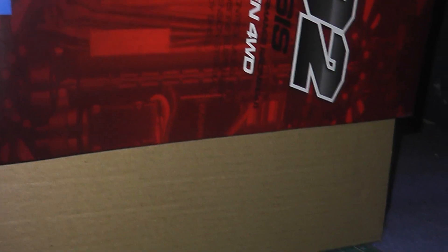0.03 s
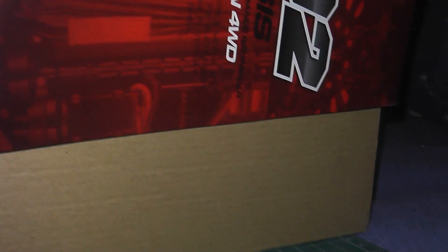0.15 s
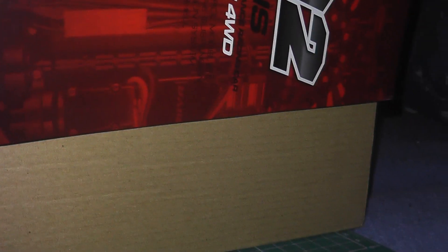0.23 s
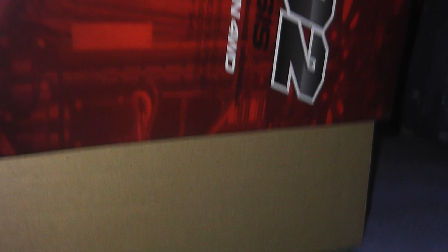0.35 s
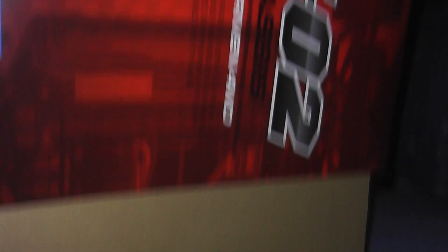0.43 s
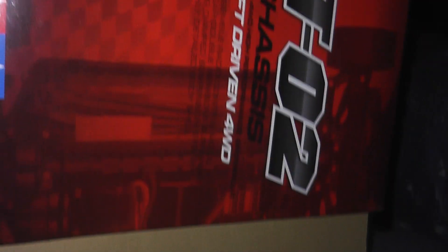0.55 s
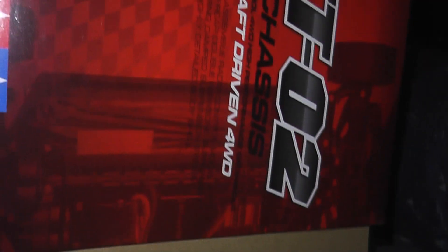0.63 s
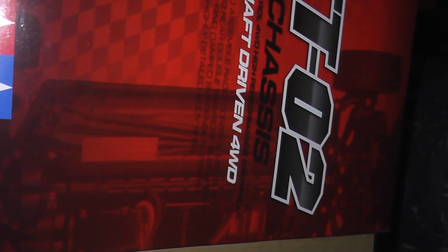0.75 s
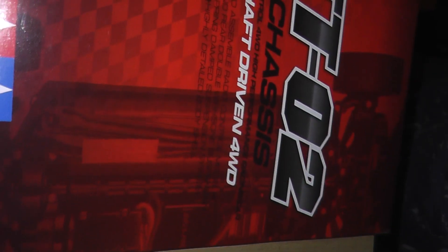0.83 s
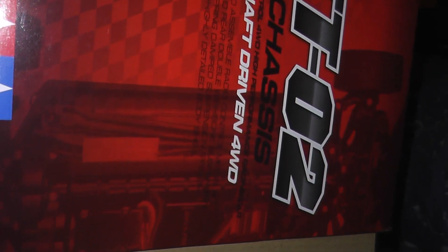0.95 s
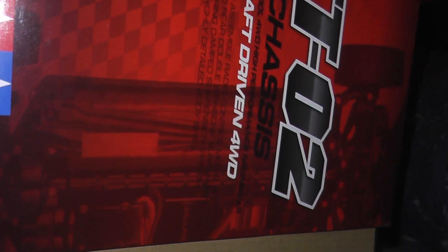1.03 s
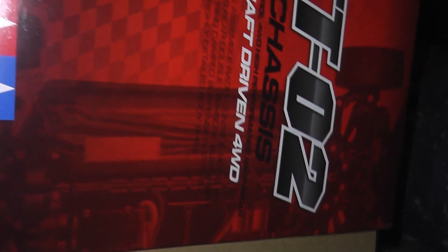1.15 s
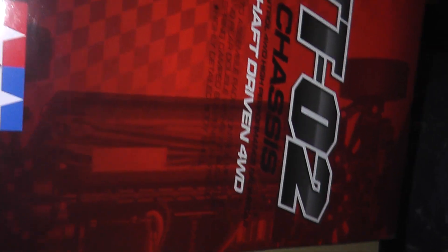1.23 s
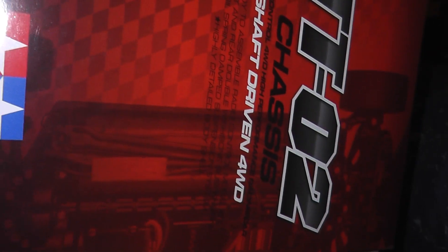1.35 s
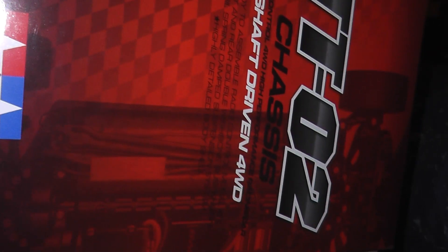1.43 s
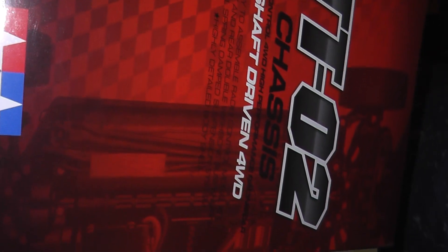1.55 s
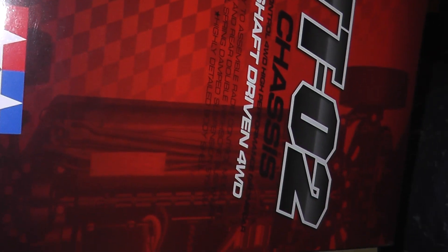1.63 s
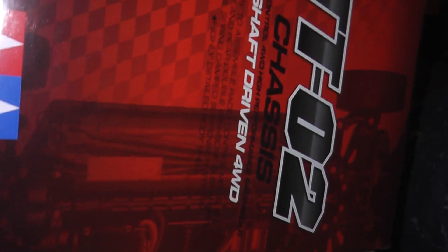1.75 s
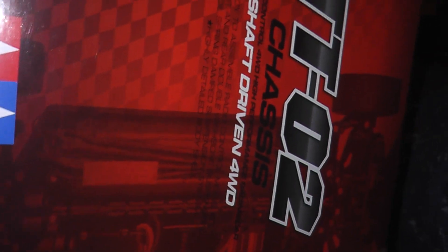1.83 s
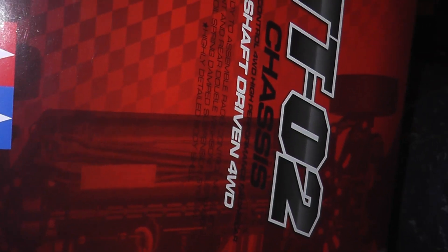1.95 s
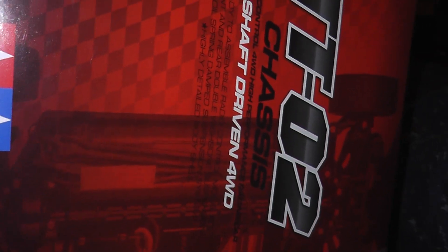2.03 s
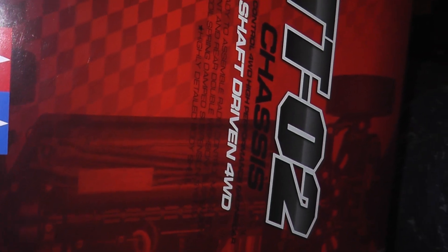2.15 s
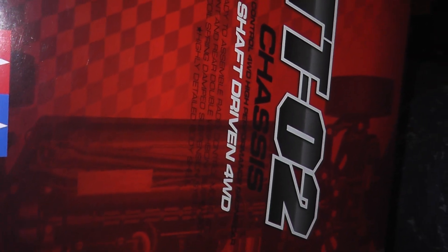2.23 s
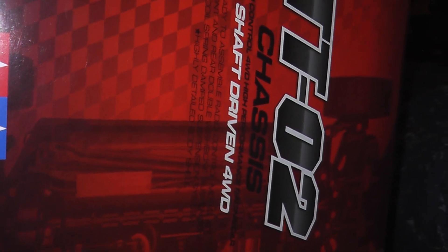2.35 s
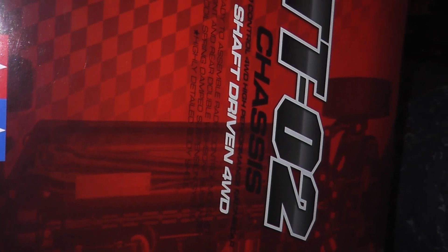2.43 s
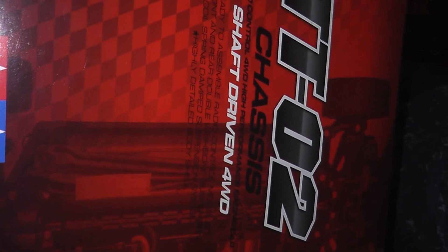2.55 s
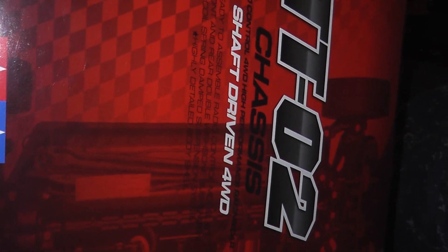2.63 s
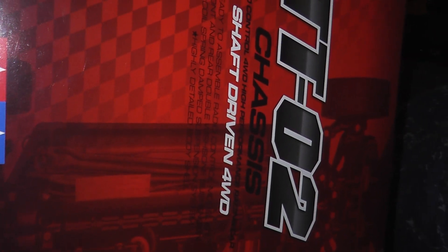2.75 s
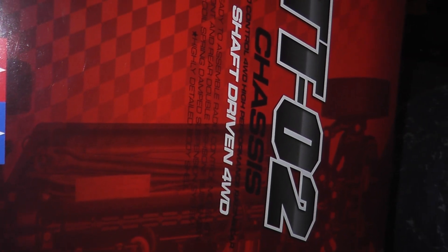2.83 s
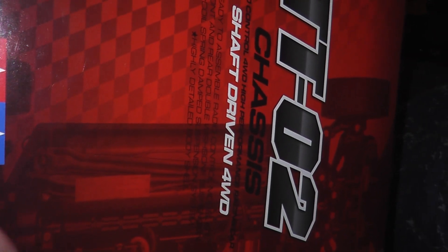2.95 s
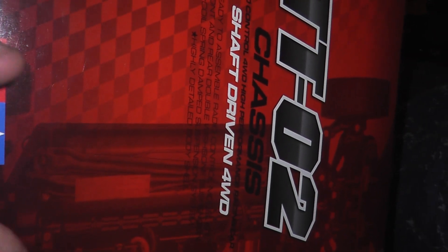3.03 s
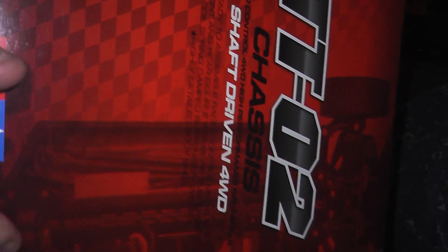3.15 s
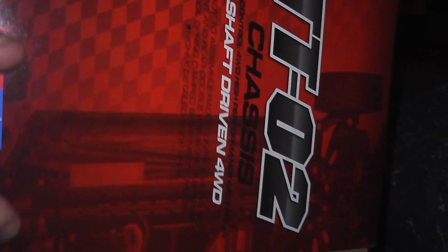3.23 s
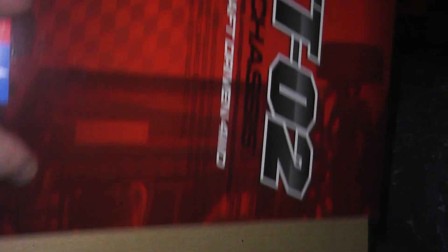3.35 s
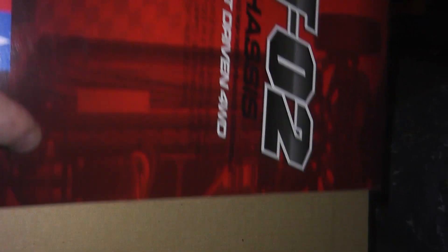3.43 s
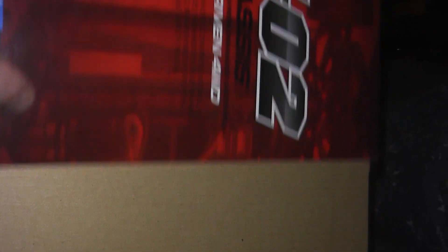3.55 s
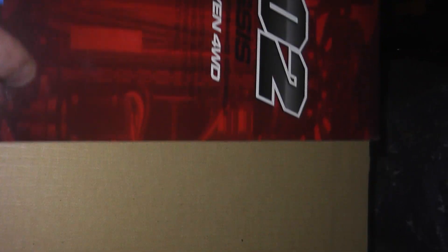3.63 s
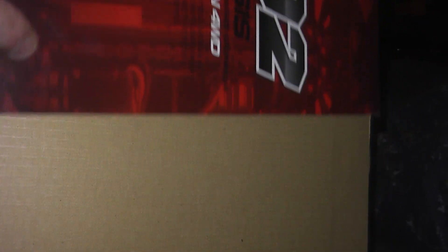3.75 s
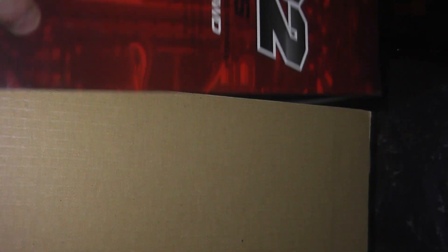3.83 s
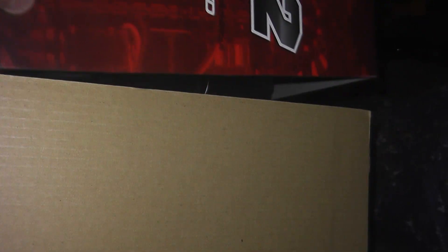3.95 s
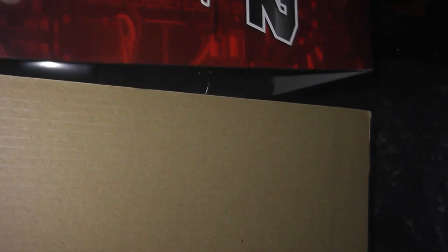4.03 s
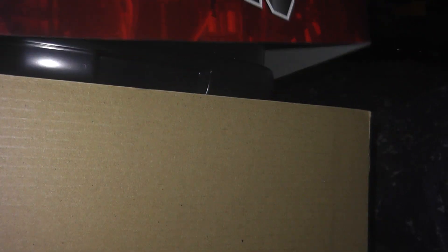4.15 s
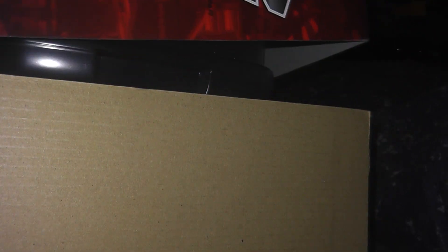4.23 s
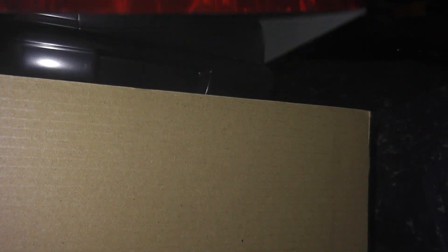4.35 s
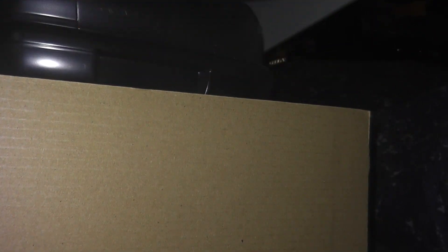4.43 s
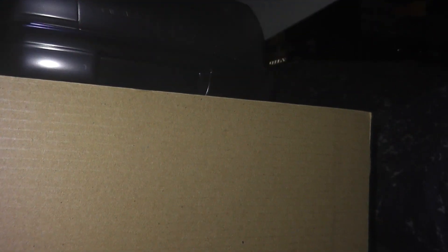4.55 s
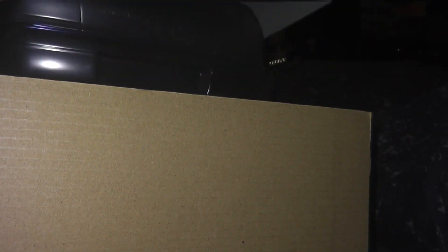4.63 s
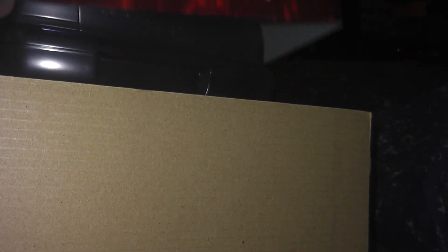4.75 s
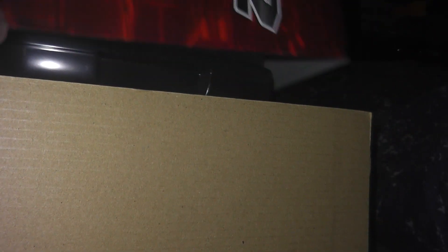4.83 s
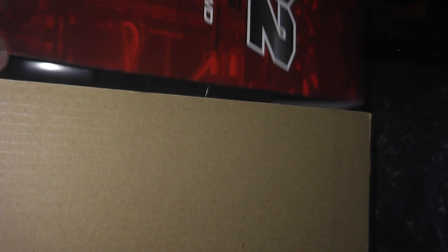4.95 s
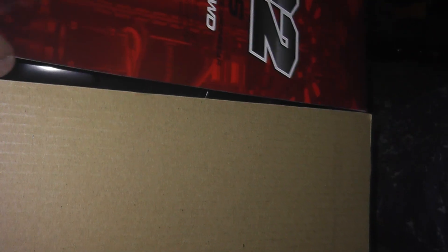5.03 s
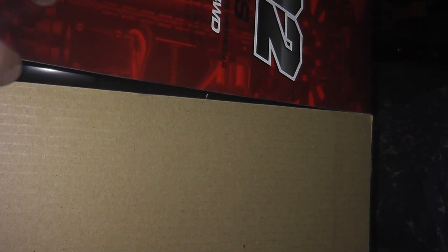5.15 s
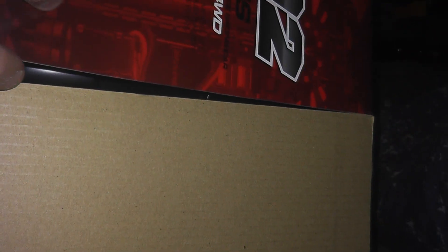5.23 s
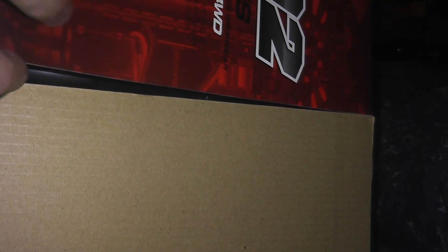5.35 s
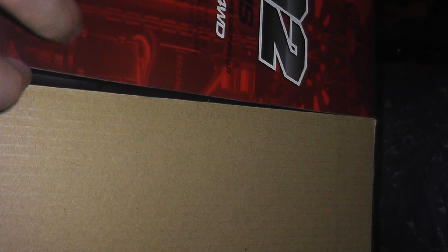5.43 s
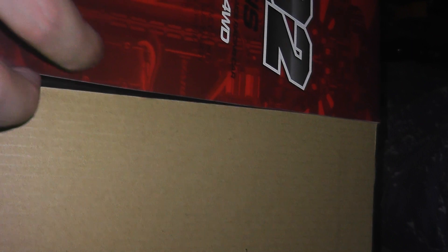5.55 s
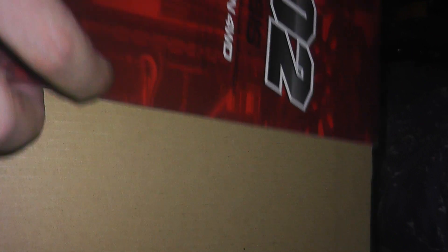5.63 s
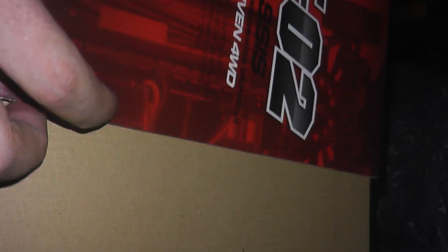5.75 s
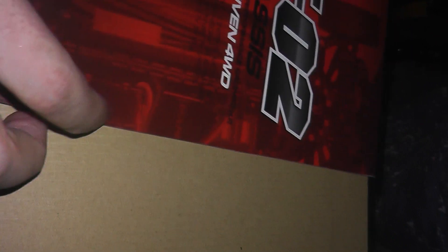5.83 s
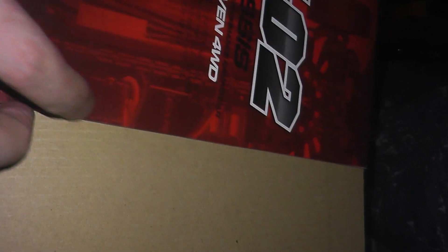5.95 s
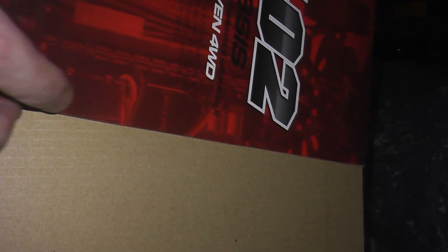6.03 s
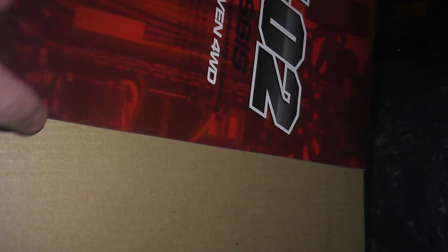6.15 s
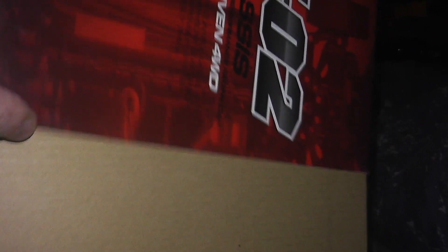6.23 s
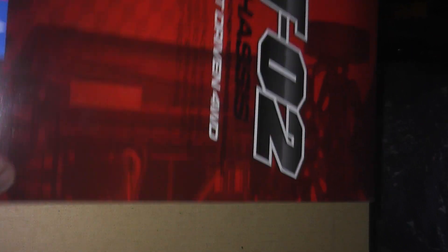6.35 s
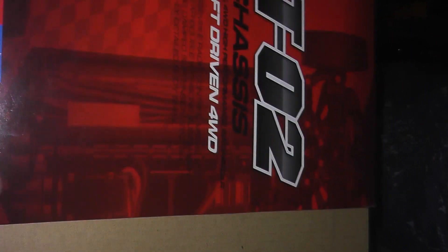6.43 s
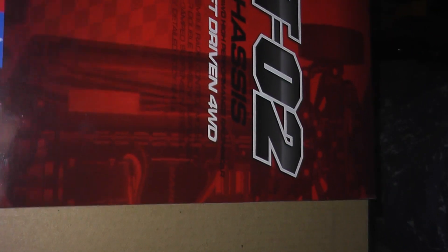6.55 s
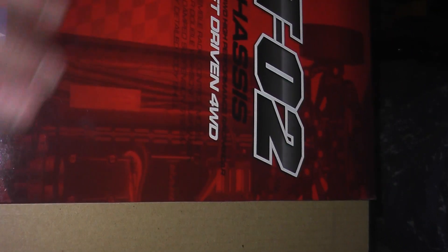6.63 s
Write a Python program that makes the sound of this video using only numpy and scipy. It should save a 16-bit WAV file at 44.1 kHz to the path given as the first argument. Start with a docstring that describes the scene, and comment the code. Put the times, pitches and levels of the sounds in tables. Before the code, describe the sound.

A cardboard lid and box are handled on a desk, close up, in a small dry room with low noise and a faint mains hum. From 0 to 0.6 s there are soft dull taps, small dry ticks and light rubbing; around 0.9 to 1.3 s a few fainter clicks and brushes. From 1.7 to 3.1 s it is nearly still, with only a weak papery rub and a soft tap at 2.8. From 3.2 to 4.2 s the lid slides with hiss, low rumble and small knocks. At 4.36 s comes a knock, then the loudest, a sharp hollow clack at 4.52. Boxy bumps and rumbling cluster from 4.8 to 5.1 s, then ease. At 5.6 s a brighter scrape begins, with knocks to 6.2. A strong thump at 6.27 s leads into rough scraping, a soft low puff at 6.47 and a fading rub.

```python
"""Card rubs on card as a thin lid slides over its corrugated base on a desk: noise shaped into a hiss,
a rim scrape and a rumble of the box walls. Knocks and ticks are noise bursts through resonances;
narrow bands of noise, from low growl to squeak, colour the rub and a decaying low sine is a puff of air.
Desk reflection dips and a faint room tail colour the box; room noise and a mains hum lie underneath."""
import sys
import numpy as np
from scipy import signal
from scipy.fft import rfft, irfft, next_fast_len
from scipy.io import wavfile
from scipy.ndimage import uniform_filter1d, map_coordinates

SR = 44100
rng = np.random.default_rng(int(sys.argv[2]) if len(sys.argv) > 2 else 0)


def inscribe(sig):
    """Save sig as 16-bit PCM at rate SR to the path in sys.argv[1].

    A 1-D sig is mono; a 2-D sig holds one channel per row.
    Samples are clipped to [-1, 1] before scaling.
    """
    pcm = np.round(np.clip(np.atleast_2d(sig).T, -1, 1) * 32767)
    wavfile.write(sys.argv[1], SR, pcm.astype(np.int16))


N = 295470


def amp(db):
    """Amplitude ratio of a level in dB."""
    return 10 ** (np.asarray(db) / 20)


def unit(x):
    """Scale to RMS 1."""
    return x / np.sqrt(np.mean(x ** 2) + 1e-20)


def along(points, hz):
    """Interpolate (freq_hz, value) points on a log frequency axis."""
    f, v = np.transpose(points)
    return np.interp(np.log(hz + 1), np.log(f + 1), v)


def wobble(rate_hz):
    """Smooth random curve, rate_hz knots a second."""
    knots = rng.standard_normal(int(N * rate_hz / SR) + 4)
    return map_coordinates(knots, [np.arange(N) * rate_hz / SR])


def filtered(x, response):
    """Multiply the spectrum of x by a complex response of frequency."""
    m = next_fast_len(x.shape[-1] + SR // 4)
    spectrum = rfft(x, m) * response(np.fft.rfftfreq(m, 1 / SR))
    return irfft(spectrum, m)[..., :x.shape[-1]]


def resonance(f, center_hz, width_hz):
    """Second-order band-pass, gain 1 at its centre."""
    return 1j * f * width_hz / (center_hz * center_hz - f * f + 1j * f * width_hz)


def modes(table):
    """Causal response of a set of resonances with alternating signs."""
    return lambda f: sum((-1) ** k * amp(db) * resonance(f, hz, width_hz)
                         for k, (hz, width_hz, db) in enumerate(table))


def walls(table):
    """Wall modes; soft card takes up little force above a kilohertz."""
    return lambda f: modes(table)(f) / (1 + 1j * f / 1100) ** 3


# Room noise spectrum, relative: freq_hz [Hz], density_db [dB per Hz]
ROOM_NOISE = [(25, -9), (60, 1), (125, -6.5), (250, -8.5), (600, -18.5), (1000, -21.5), (2300, -30.5),
              (3000, -25.5), (4500, -34), (5500, -24.5), (9000, -33.5), (16000, -38.5)]
# Left-right likeness of the room noise: freq_hz [Hz], likeness [-1 to 1]
ROOM_ALIKE = [(60, -0.016), (180, -0.29), (550, -0.84), (1650, 0.15), (4970, 1), (15000, 0.084)]


def background():
    """Partly correlated stereo room noise and a slightly unsteady 100 Hz mains hum."""
    def mid_side(f):
        angle = np.arccos(np.clip(along(ROOM_ALIKE, f), -1, 1)) / 2
        return amp(along(ROOM_NOISE, f)) * [1 + 0 * f, np.tan(angle)]

    mid, side = filtered(rng.standard_normal((2, N)), mid_side)
    noise = amp(-62.0) * np.array([mid + side, mid - side]) / np.std(mid)
    hum_gain = amp(-61.5) * amp(wobble(3.46))
    hum = hum_gain * np.sin(2 * np.pi * 100 * np.arange(N) / SR + 0.22 * wobble(5.3))
    return noise + hum


# Hands resting on the box: hiss_db, bright_db, rim_db, lower_wall_db, upper_wall_db [dB]
RESTING_DB = [-80, -96, -74.5, -72, -68.5]
# Long slides, one table each: time_s [s],
# hiss_db, bright_db, rim_db, lower_wall_db, upper_wall_db [dB]
SLIDES = [
    [(1.68, -71.5, -95, -68, -70, -67.5), (1.898, -71.5, -88, -69.5, -61.5, -60.5),
     (2.348, -62, -70, -62.5, -55, -55), (2.414, -74.5, -85, -73, -63, -63),
     (3.028, -66.5, -84, -67, -62, -58.5), (3.17, -66.5, -84, -59, -55, -63)],
    [(3.17, -65, -81, -58, -52, -50.5), (3.224, -56, -78, -48.5, -41, -48),
     (3.264, -63.5, -73, -54.5, -41.5, -56), (3.356, -54, -64, -52, -42.5, -44),
     (3.5, -58, -68, -53.5, -52.5, -49.5), (3.588, -53.5, -60, -51.5, -49, -47),
     (3.7, -68, -67, -54, -50, -55)],
    [(3.7, -64, -66, -54.5, -48.5, -51.5), (3.834, -57.5, -58, -56, -51, -51.5),
     (3.918, -62.5, -62, -55, -53, -54), (3.926, -50, -72, -59, -56, -56),
     (3.958, -60.5, -68, -53, -45, -46), (4.158, -67, -62.5, -56.5, -49.5, -54),
     (4.18, -74, -80, -65, -64, -52)],
    [(5.592, -47, -51, -49, -46, -35), (5.666, -59, -59, -56.5, -45, -46),
     (5.706, -51.5, -53, -52, -42, -46.5), (5.816, -58.5, -65, -55, -45, -43),
     (5.846, -49, -65, -40, -33, -33), (5.858, -64, -78, -53, -41, -46), (5.89, -71, -84, -69, -51, -53)],
    [(6.268, -48, -57, -39, -35, -34), (6.276, -43.5, -50.5, -41, -53, -29),
     (6.37, -51, -52.5, -40, -41, -40.5), (6.462, -49, -64, -35, -28.5, -33.5),
     (6.468, -52, -69, -55, -45, -47)],
    [(6.468, -55, -70, -35.5, -31, -34.5), (6.49, -57.5, -77, -49.5, -36.5, -44.5),
     (6.584, -55.5, -63, -52.5, -48, -49), (6.654, -69, -92, -59.5, -45.5, -47.5),
     (6.7, -67, -82, -71, -52, -63)],
]
# Short strokes: start_s, end_s [s], start_hiss_db, end_hiss_db [dB],
# bright_db, rim_db, lower_wall_db, upper_wall_db [dB over the hiss]
STROKES = [(0.056, 0.208, -63.5, -57, -9, -9, 4.4, 1.3), (0.202, 0.558, -63.5, -69, -20, 0.5, 12, 5.1),
           (1.094, 1.207, -67, -67, -16, -1, 3.1, 5), (1.21, 1.317, -57, -71.5, -24, 2, 2, 1.7),
           (4.319, 4.423, -66.5, -61, 4.5, 8, 18.3, 14.4), (4.43, 4.517, -59, -63, -12, 7, 16, 17),
           (4.516, 4.587, -38.5, -69.5, -9, 5, 8.3, 19), (4.589, 4.754, -65, -78.5, -18, 13, 27.6, 23),
           (4.768, 4.803, -58.5, -51, -17, 2, 19.7, 14), (4.82, 4.848, -58.5, -44, -22, 8, 25.3, 10),
           (4.901, 4.998, -56, -60, -10, 5, 25.2, 19.7), (5.005, 5.198, -62.5, -73.5, -10, 9.5, 27.3, 18),
           (5.191, 5.234, -62, -62.5, -6, 6, 20.3, 16.2), (5.235, 5.357, -79.5, -81, -10, 11, 25.3, 17.5),
           (5.348, 5.597, -67.5, -65.5, -9.5, 8.5, 19.3, 19.2), (5.884, 5.952, -68.5, -51, -7, 7, 13, 11.6),
           (5.951, 6.056, -60.5, -69.5, -13, 9.5, 19, 18.7), (6.043, 6.113, -53, -57.5, -17, 2.5, 7.4, 4.4),
           (6.109, 6.256, -53, -55.5, -11, 5.5, 8.8, 7.9)]
ATTACK_S, RELEASE_S = 0.028, 0.013  # the hand sets off and stops


def strokes():
    """Gains of the five rubbing layers: each slide or stroke sets off, follows its levels and stops."""
    t = np.arange(N) / SR
    power = amp(2 * np.array(RESTING_DB))[:, None] * np.ones(N)
    short = []
    for start_s, end_s, start_db, end_db, *over_db in STROKES:
        ends = [(start_s, start_db), (end_s, end_db)]
        short.append([(s, db, *(db + np.array(over_db))) for s, db in ends])
    for rows in [*SLIDES, *short]:
        s, *levels_db = np.transpose(rows)
        i = max(round((s[0] - ATTACK_S) * SR), 0)
        j = round((s[-1] + RELEASE_S) * SR)
        now = t[i:j]
        ramp = np.minimum((now - s[0]) / ATTACK_S, (s[-1] - now) / RELEASE_S)
        gate = np.clip(ramp + .5, 0, 1)
        gains = amp([np.interp(now, s, db) for db in levels_db])
        power[:, i:j] += (gains * gate) ** 2
    return np.sqrt(power)


def fibres(grain_db, rate_hz, patchy_db, wide):
    """Friction force along a wide contact, for two ports: noise in uneven grains and colour patches."""
    _, _, z = signal.stft(rng.standard_normal((2, N)), SR, nperseg=512)
    patches = uniform_filter1d(rng.standard_normal(z.shape[1:]), 10, 0)
    patches = uniform_filter1d(patches, 8, 1)
    noise = signal.istft(z * amp(patchy_db * unit(patches)), nperseg=512)[1][:, :N]
    a, b = noise * amp(grain_db * wobble(rate_hz))
    return np.array([a + wide * b, a - wide * b])


def slips(rate_hz, size):
    """Now and then the card sticks and lets go: a gain that jumps and fades within milliseconds."""
    jumps = (rng.random(N) < rate_hz / SR) * rng.exponential(size, N)
    decay = np.exp(-1 / (.004 * SR))
    return 1 + signal.lfilter([1], [1, -decay], jumps)


# Where the hiss is strongest as the contact moves: time_s [s], peak_hz [Hz]
SHEEN = [(0, 7040), (1.7, 6800), (1.9, 8540), (2.1, 7400), (3.05, 6130), (3.4, 6000), (3.9, 7600),
         (4.4, 7900), (5.7, 8500), (6.1, 5500), (6.7, 6860)]


def sheen(x):
    """A broad 6 dB peak that wanders through the hiss."""
    hz, t, z = signal.stft(x, SR, nperseg=512)
    octaves = np.log2((hz[:, None] + 1) / np.interp(t, *np.transpose(SHEEN)))
    peak_db = 6 * np.exp(-(octaves / .22) ** 2)
    return signal.istft(z * amp(peak_db), nperseg=512)[1][:, :N]


# Surface hiss spectrum, relative: freq_hz [Hz], density_db [dB per Hz]
HISS = [(1800, -39), (2500, 3.5), (3000, 0.5), (4500, 1.5), (5500, 1), (8000, 0.5), (9500, -4),
        (11000, -48)]
# Brightest part of the hiss, relative: freq_hz [Hz], density_db [dB per Hz]
BRIGHT = [(8000, -9.5), (9500, -3), (11000, -1.5), (13000, -6.5), (16000, -16)]
# Modes of the lid's rim: center_hz [Hz], width_hz [Hz], relative_db [dB]
RIM = [(821, 122, -2), (1139, 140, -2), (1404, 151, -5.5), (1566, 116, -4.5), (1795, 440, -10.5)]
# Modes of the box walls, first four lower: center_hz [Hz], width_hz [Hz], relative_db [dB]
WALLS = [(94, 62, -4.5), (150.4, 38.6, 1), (211.6, 38, -2), (267.2, 36.3, 1.5), (296, 47, -2),
         (406.4, 94, -2.5), (544, 89, -2.5), (646, 84, -4), (854, 190, -17)]
CATCH_DB = -61.5  # hiss level under which the card slides without catching fully


def rubbing():
    """Card on card: the surface hisses evenly, the rim scrapes, the walls rumble in lumps."""
    hiss_gain, bright_gain, rim_gain, lower_gain, upper_gain = strokes()
    surface = fibres(grain_db=1.5, rate_hz=400, patchy_db=1.5, wide=.15)
    hiss = unit(sheen(filtered(surface, lambda f: amp(along(HISS, f)))))
    bright = unit(filtered(surface, lambda f: amp(along(BRIGHT, f))))

    catching = slips(rate_hz=45, size=.55) ** np.clip(hiss_gain / amp(CATCH_DB), 0, 1)
    scrape = catching * fibres(grain_db=-0.5, rate_hz=81, patchy_db=2.0, wide=0.086)
    rim = unit(filtered(scrape, modes(RIM)))

    lumps = catching * fibres(grain_db=2.0, rate_hz=36, patchy_db=2.5, wide=0.12)
    lower = unit(filtered(lumps, walls(WALLS[:4])))
    upper = unit(filtered(lumps, walls(WALLS[4:])))
    surface_sound = hiss_gain * hiss + bright_gain * bright
    return surface_sound + rim_gain * rim + lower_gain * lower + upper_gain * upper


def burst(response, t60_s, push, rise_s):
    """One contact of peak 1: a push and a short rattle of after-contacts through a resonant body."""
    t = np.arange(SR // 4) / SR
    force = rng.standard_normal(len(t)) * amp(-60 * t / np.clip(t60_s, .002, .4))
    force[0] += push
    sound = filtered(force, response) * amp(-60 * t / 1.2) * (1 - np.exp(-t / rise_s))
    return sound / np.abs(sound).max()


# Knocks on the box: start_s [s], peak_db [dB before left-right scatter], pitch_hz [Hz],
# t60_s [s, of the rattle; also sets the panel's damping]
KNOCKS = [(0.01, -33, 200, 0.017), (0.023, -30.5, 168, 0.03), (0.172, -42.5, 150, 0.06),
          (0.416, -23.5, 160, 0.06), (0.51, -40.5, 196, 0.17), (0.874, -40, 305, 0.063),
          (1.082, -40, 117, 0.03), (1.151, -45, 353, 0.051), (2.802, -29.5, 260, 0.13),
          (3.122, -36, 113, 0.34), (3.237, -27.5, 220, 0.11), (3.35, -27.5, 130, 0.18),
          (3.633, -28.5, 195, 0.086), (3.662, -32.5, 142, 0.066), (3.926, -21, 560, 0.088),
          (3.929, -25, 169, 0.071), (3.954, -34.5, 182, 0.043), (3.999, -31.5, 445, 0.12),
          (4.108, -35, 197, 0.14), (4.362, -17, 614, 0.04), (4.373, -24, 437, 0.024),
          (4.424, -29, 280, 0.12), (4.444, -30, 563, 0.03), (4.517, -7, 162, 0.028),
          (4.519, -12, 463, 0.04), (4.536, -18.5, 240, 0.08), (4.59, -21.5, 454, 0.089),
          (4.764, -29.5, 262, 0.068), (4.827, -14, 267, 0.24), (4.86, -16.5, 148, 0.081),
          (4.881, -20, 178, 0.11), (4.899, -15.5, 253, 0.14), (4.944, -20.5, 190, 0.043),
          (5.014, -22.5, 262, 0.09), (5.075, -22, 180, 0.086), (5.132, -24, 165, 0.093),
          (5.351, -36, 199, 0.15), (5.586, -24.5, 290, 0.06), (5.609, -27, 136, 0.07),
          (5.766, -26.5, 268, 0.088), (5.801, -24, 260, 0.08), (5.934, -16, 227, 0.037),
          (6.042, -30, 192, 0.032), (6.117, -34, 207, 0.09), (6.203, -22.5, 252, 0.08),
          (6.275, -11, 210, 0.14), (6.286, -15, 553, 0.045), (6.325, -20.5, 626, 0.06),
          (6.347, -24, 650, 0.039)]
RATTLE = 0.039  # after-contacts over the blow
SCATTER_DB = 1.5  # left-right scatter of the struck spots


def knocks():
    """A soft blow rings the struck panel at its own pitch and, more weakly, the wall modes near it."""
    out = np.zeros((2, N + SR))
    for start_s, peak_db, pitch_hz, t60_s in KNOCKS:
        panel_width_hz = np.log(1000) / (np.pi * t60_s) + 0.064 * pitch_hz

        def body(f):
            near = 0.25 + 0.52 * resonance(f, pitch_hz, pitch_hz)
            panel = 1.4 * resonance(f, pitch_hz, panel_width_hz)
            return (walls(WALLS)(f) * near + panel) / (1 + 1j * f / (5 * pitch_hz))

        side = amp(SCATTER_DB * rng.standard_normal() * np.array([[.5], [-.5]]))
        blow = burst(body, t60_s, push=1 / RATTLE, rise_s=0.00075)
        out[:, round(start_s * SR):][:, :SR // 4] += amp(peak_db) * side * blow
    return out[:, :N]


# Edges catching: start_s [s], snap_peak_db [dB], pitch_hz [Hz], rim_peak_db [dB]
TICKS = [(0.023, -32.5, 5470, -31), (0.094, -65, 3000, -45), (0.129, -69, 3000, -45),
         (0.173, -64, 3000, -47), (0.193, -40, 6950, -34.5), (0.2935, -24.5, 7040, -29),
         (0.417, -45.5, 6300, -41), (0.875, -49, 2660, -36), (0.8854, -44, 5700, -48),
         (1.0187, -62, 3200, -55), (1.081, -34.5, 7400, -43), (1.1066, -38, 4100, -34.5),
         (1.697, -58, 2940, -54), (2.3085, -42, 7750, -50), (3.216, -45, 2980, -38),
         (3.928, -30, 7000, -36.5), (4.001, -47, 2700, -36.5), (4.363, -33.5, 8200, -32.5),
         (4.515, -13, 8400, -21.5), (4.5899, -48, 3070, -28.5), (4.776, -41.5, 2940, -47),
         (4.8244, -30.5, 5250, -43), (4.8986, -37.5, 2930, -27.5), (4.931, -44, 3000, -34),
         (5.009, -58, 3000, -37), (5.0709, -38, 7560, -33.5), (5.124, -46, 9200, -39.5),
         (5.42, -50, 5000, -40), (5.457, -63, 3000, -40), (5.59, -29, 8600, -25.5), (5.932, -48, 2920, -22),
         (6.0424, -42, 5720, -44), (6.203, -45, 2980, -31.5), (6.2745, -27.5, 7100, -20)]
SNAP_T60_S, SNAP_TOP_HZ = 0.017, 12200  # decay of the snap's force; where its top end rolls off


def ticks():
    """A dry snap with a broad peak, and the rim ringing under it."""
    out = np.zeros(N + SR)
    for start_s, snap_db, pitch_hz, rim_db in TICKS:
        def body(f):
            peaks = modes([(3000, 1500, -8), (pitch_hz, 0.28 * pitch_hz, 0)])
            return peaks(f) / (1 + 1j * f / SNAP_TOP_HZ) ** 2

        snap = amp(snap_db) * burst(body, SNAP_T60_S, push=3.2, rise_s=0.00008)
        ring = amp(rim_db) * burst(modes(RIM), 1.8 * SNAP_T60_S, push=10.3, rise_s=0.00018)
        out[round(start_s * SR):][:SR // 4] += snap + ring
    return out[:N]


# Narrow bands of noise within the rub, from low growl to squeak: start_s, end_s [s],
# center_hz [Hz], width_hz [Hz, of each of two filter passes], rms_db [dB before the gate]
RUB_BANDS = [(1.21, 1.282, 760, 200, -56), (2.183, 2.78, 319, 74.4, -57), (3.305, 3.486, 2780, 500, -58.5),
             (4.782, 4.876, 820, 69, -42.5), (6.294, 6.383, 600, 200, -30.5),
             (6.397, 6.477, 3710, 400, -48)]


def rub_bands():
    """Narrow bands of noise within the rub: noise passed twice through a resonance, faded in and out."""
    t = np.arange(N) / SR
    out = 0
    for start_s, end_s, center_hz, width_hz, rms_db in RUB_BANDS:
        fade_s = .2 * (end_s - start_s)
        gate = np.clip(np.minimum(t - start_s, end_s - t) / fade_s, 0, 1)
        band = filtered(rng.standard_normal(N), lambda f: resonance(f, center_hz, width_hz) ** 2)
        out = out + amp(rms_db) * gate * unit(band)
    return out


# Air pushed out as the lid drops home: start_s [s], pitch_hz [Hz],
# level_db [dB before rise and decay], t60_s [s]
PUFF = (6.47, 60, -29, .25)


def puff():
    """A low soft push of air: a sine with a gentle rise and an exponential decay."""
    start_s, pitch_hz, level_db, t60_s = PUFF
    age_s = np.clip(np.arange(N) / SR - start_s, 0, None)
    envelope = amp(level_db - 60 * age_s / t60_s) * (1 - np.exp(-age_s / .02))
    return envelope * np.sin(2 * np.pi * pitch_hz * age_s)


# Desk reflection dips: center_hz [Hz], width_hz [Hz], depth [0-1]
DIPS = [(980, 100, 0.64), (2210, 580, 0.48), (4580, 670, 0.61)]


def desk(x):
    """The reflection off the desk partly cancels a few fixed bands."""
    return filtered(x, lambda f: 1 - sum(np.clip(depth, 0, 1) * resonance(f, hz, width_hz)
                                         for hz, width_hz, depth in DIPS))


# Room decay: freq_hz [Hz], t60_s [s]
ROOM_DECAY = [(100, 0.39), (1000, 0.044), (10000, 0.075)]


def room(x):
    """Each frequency of the room's answer dies at its own speed; the ports share most of it."""
    hz, t, z = signal.stft(rng.standard_normal((2, SR // 2)), SR, nperseg=256)
    decay = amp(-60 * t / along(ROOM_DECAY, hz)[:, None])
    a, b = signal.istft(z * decay, SR, nperseg=256)[1]
    tail = np.array([a + 0.094 * b, a - 0.21 * b]) / np.linalg.norm(a)
    delayed = np.pad(x.mean(0), (400, 0))  # 400 samples
    return signal.fftconvolve(delayed[None], tail, axes=1)[:, :N]


# Port balance: freq_hz [Hz], left_minus_right_db [dB]
LEAN = [(60, 0), (150, 0.5), (380, -1), (950, 4), (2380, 2.5), (5980, 0), (15000, 3)]
# Port phase: freq_hz [Hz], left_lead_rad [rad]
TURN = [(60, 0.17), (500, 0.47), (1000, 0.87), (2000, 0.69), (4000, 0.022), (8000, 0.28), (13000, 0.88)]


def spread(pair):
    """Two close microphone ports: level and phase differ a little with frequency, mostly louder left."""
    def half(f):
        return amp(along(LEAN, f) / 2) * np.exp(.5j * along(TURN, f))

    return filtered(pair, lambda f: [half(f), 1 / half(f)])


def scene():
    """The box with its desk dips and room tail, over the background."""
    box = desk(rubbing() + knocks() + ticks() + rub_bands() + puff())
    return spread(box + amp(-18.5) * room(box)) + background()


TOP_HZ = 15830


def record(dry):
    """Two-pole bass cut at 55 Hz; nothing passes from TOP_HZ up."""
    return filtered(dry, lambda f: (1j * f / (1j * f + 55)) ** 2 * (f < TOP_HZ))


dry = scene()
out = record(dry)
inscribe(out)
```